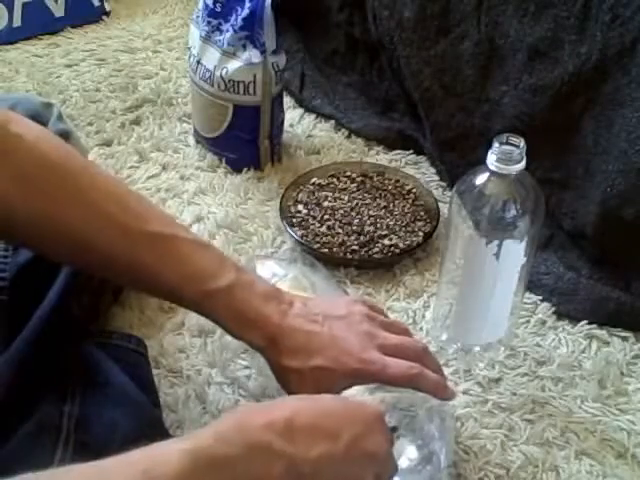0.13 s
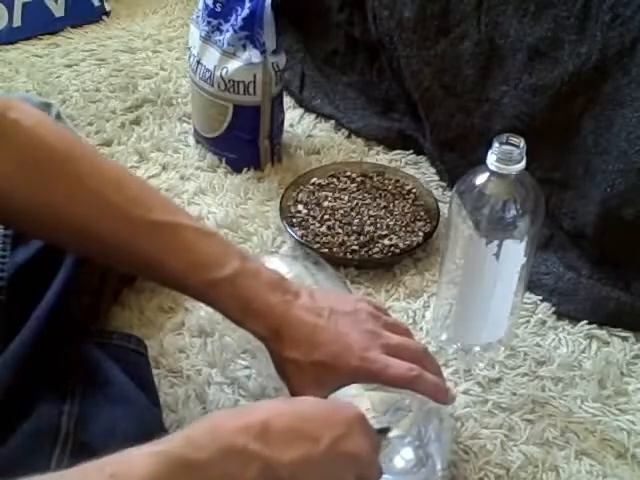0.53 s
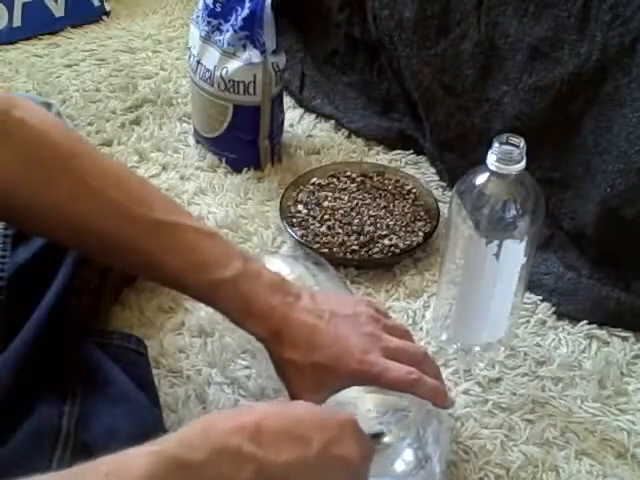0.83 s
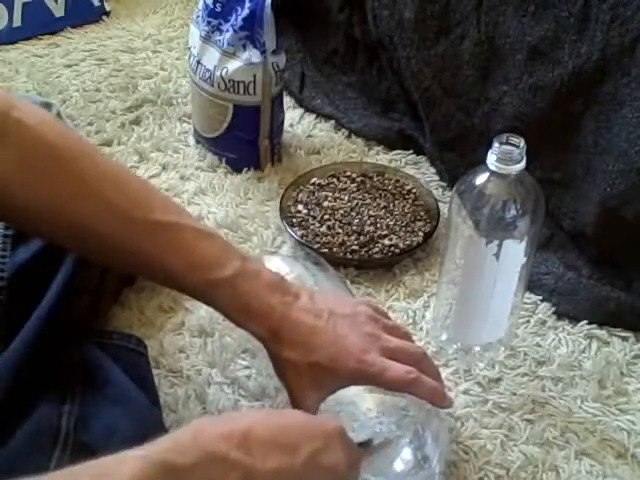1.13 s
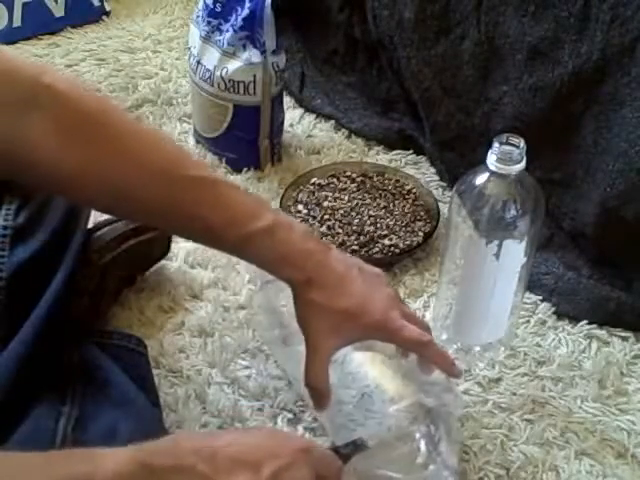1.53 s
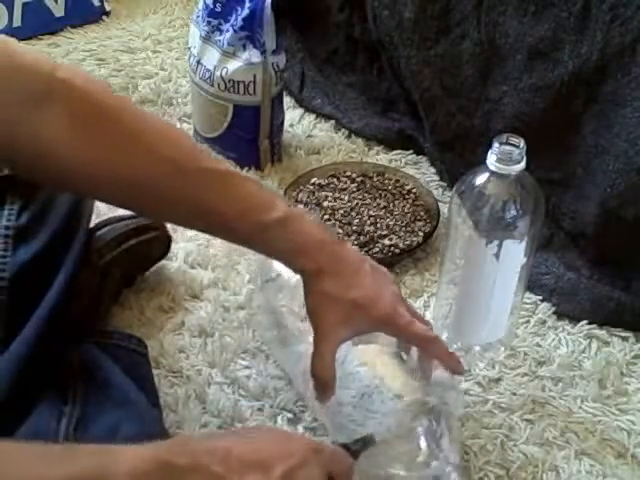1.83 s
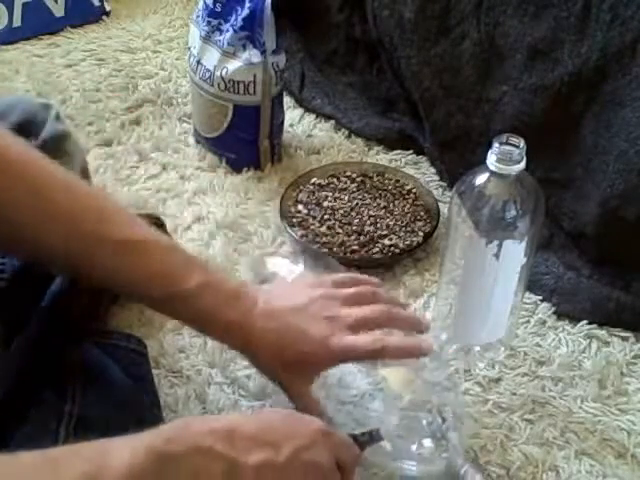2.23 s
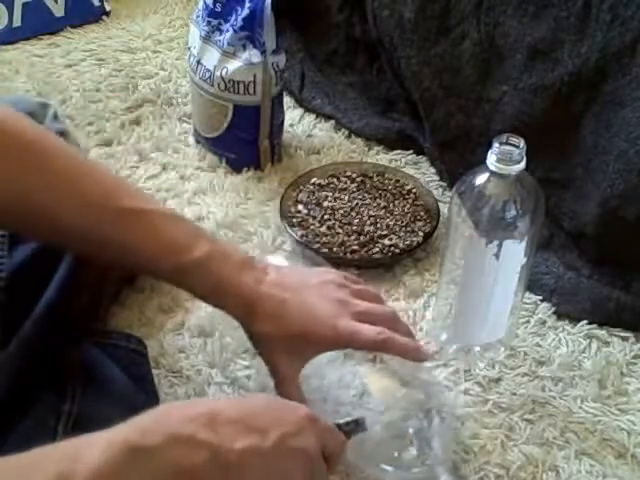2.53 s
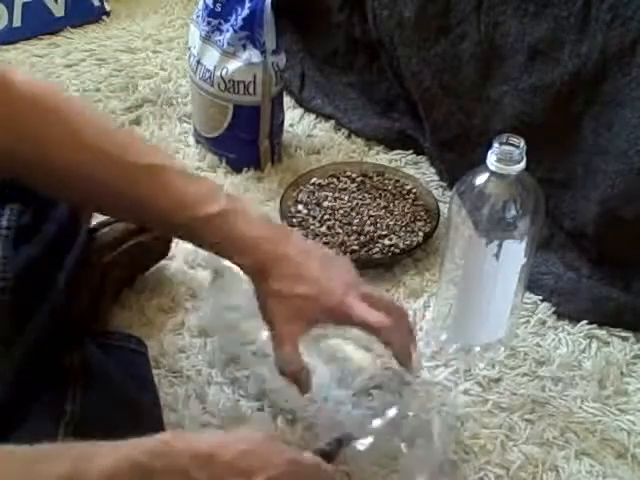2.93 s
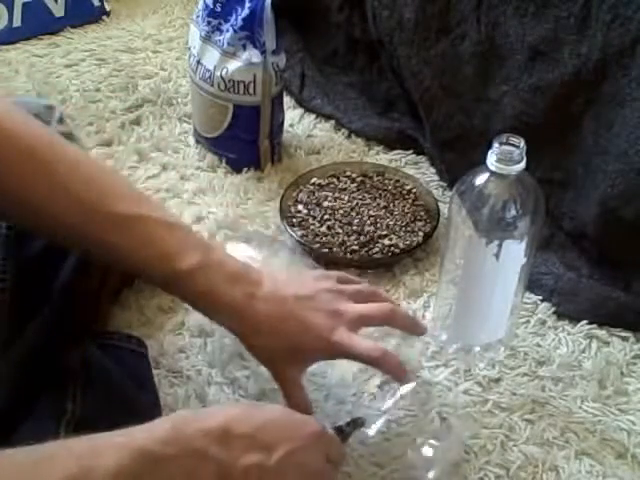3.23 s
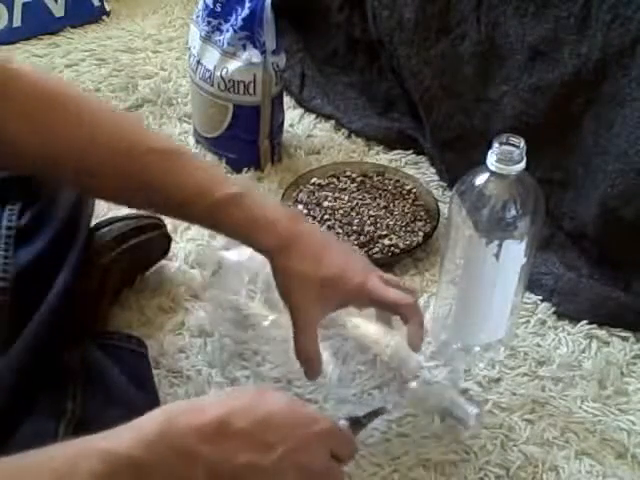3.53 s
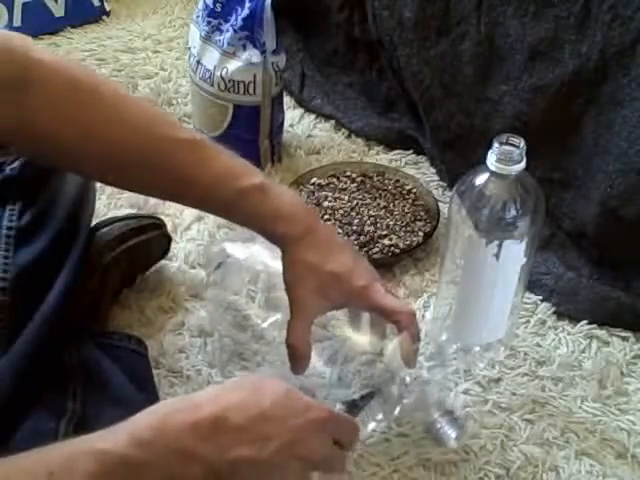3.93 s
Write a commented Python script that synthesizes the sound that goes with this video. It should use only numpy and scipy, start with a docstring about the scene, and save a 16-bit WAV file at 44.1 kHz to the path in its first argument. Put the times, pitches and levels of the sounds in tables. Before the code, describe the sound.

A thin plastic bottle snaps, crackles and pops hollowly in irregular bursts as it is cut with a small blade, close up indoors.

```python
"""A thin plastic bottle, held down on a carpet and worked with a small blade, close to the microphone. Its wall
snaps in bursts, each snap a bright crack, a knock of the panel and a thump of the shell, whose pitch is set by
the grip. Stiff patches pop hollowly. Hiss and shell rumble swell where the plastic is scraped and where the
wall crinkles on after a snap. A small room answers over a low hum, and the loudest cracks are flattened at a
ceiling."""
import sys
import numpy as np
from scipy import signal
from scipy.fft import rfft, irfft, next_fast_len
from scipy.io import wavfile
from scipy.ndimage import map_coordinates

SR = 44100
rng = np.random.default_rng(int(sys.argv[2]) if len(sys.argv) > 2 else 0)


def store_pcm(level_fs):
    """Save levels as 16-bit WAV."""
    pcm = np.round(np.clip(level_fs, -1, 1) * 32767).astype(np.int16)
    wavfile.write(sys.argv[1], SR, np.atleast_2d(pcm).T)


N = 180413

# The wall snapping, close up. Each row: start in seconds, then crack, after-ring and push in relative dB.
WALL_SNAPS = [(.0077, -36, -51, -36), (.0503, -15, -21.5, -36), (0.0996, -20, -34, -26),
              (0.192, -32.5, -41, -40), (.418, -42.5, -47.5, -49.5), (1.0307, -20, -19.5, -39),
              (1.0437, -23, -26, -30), (1.2674, -3, -6.5, -30), (1.27, -8, -14.5, -33.5),
              (1.2807, -13, -12.5, -48.5), (1.4497, -26, -33.5, -39.5), (1.4653, -30.5, -46, -42.5),
              (1.498, -36.5, -67, -36.5), (1.5368, -18, -31, -34.5), (1.5465, -15, -23.5, -33.5),
              (1.62, -28.5, -37, -47), (1.7356, -40, -56, -44), (1.7458, -33, -53, -35),
              (1.777, -33, -23.5, -15.5), (1.7789, -10.5, -45, -13), (1.8083, -19.5, -30.5, -26.5),
              (1.8688, -37, -66, -71), (2.0317, -27, -29, -26.5), (2.095, -31.5, -34, -36),
              (2.1659, -37.5, -46, -48), (2.29, -37, -44, -39), (2.3182, -23, -24, -45),
              (2.332, -16, -17.5, -42), (2.3374, -14.5, -26, -26), (2.4476, -34, -41, -42),
              (2.471, -34, -43, -32.5), (2.4861, -34, -36, -35.5), (2.6856, -39.5, -44, -47),
              (2.697, -20, -23.5, -28.5), (2.7167, -19, -32, -28), (2.8503, -34.5, -42.5, -57),
              (2.978, -40.5, -40, -54.5), (2.9996, -22.5, -27, -33.5), (3.0095, -17, -35, -14.5),
              (3.0143, -20.5, -31, -14.5), (3.0417, -22.5, -28, -52), (3.0977, -23.5, -25.5, -33),
              (3.194, -29.5, -38.5, -53), (3.452, -32.5, -38.5, -40), (3.6886, -18.5, -24.5, -19),
              (3.7102, -26, -34.5, -54)]
# Tone of the crack, the knock and the thump. Each row: frequency in Hz, relative level in dB.
SHEET_SPECTRUM = [(300, -20.5), (900, -8), (2000, -11), (2800, -10.5), (4200, -9), (5100, 3), (5800, 4.5),
                  (6700, -8), (7900, -16.5), (9300, -12), (10400, 1), (12100, -17.5), (14500, -16.5),
                  (16000, -26)]
PANEL_SPECTRUM = [(70, -25), (150, -1.5), (400, -6.5), (640, -3.5), (860, 0), (1020, -3.5), (1400, -9.5),
                  (1800, -10.5), (2500, -13.5), (5000, -19)]
SHELL_SPECTRUM = [(60, -40.5), (115, -24), (175, -6.5), (245, -2.5), (300, -3.5), (400, -11), (600, -18),
                  (1500, -27.5), (4000, -58)]
SHELL_HZ = 258  # pitch under an ordinary grip
PANEL_LIMIT_DB = -21  # above this push the knock levels off and the shell takes the rest
HOLLOW_DB, HOLLOW_GROWTH = -20.5, 0.69  # air ring after a 0 dB push; dB of ring per dB of push


def snaps(knock_dry=0.2, knock_wet=0.7, thump_dry=0.79, thump_wet=0.4):
    """Each snap cracks the sheet, knocks the panel, swings the shell and rings the air inside."""
    track, t = np.zeros(N), np.arange(SR // 3) / SR
    for start, crack_db, after_db, push_db in WALL_SNAPS:
        hz = grip_hz(start)
        tension = np.exp(0.015 * rng.standard_normal())  # shifts the wall's resonances a little
        sheet = struck(impulse(stretched(SHEET_SPECTRUM, tension), len(t)))
        panel = struck(impulse(stretched(PANEL_SPECTRUM, tension), len(t)))
        shell = struck(impulse(stretched(SHELL_SPECTRUM, hz / SHELL_HZ), len(t)))
        thump = amp(push_db)
        knock = thump / np.hypot(1, amp(push_db - PANEL_LIMIT_DB))
        hollow = amp(HOLLOW_DB + HOLLOW_GROWTH * push_db)
        add(track, start, amp(crack_db) * crease(sheet, rise_s=0.00047))
        add(track, start, knock_dry * knock * crease(panel, rise_s=0.00018))
        add(track, start, thump_dry * thump * shell_flex(t, hz))
        add(track, start, hollow * cavity(t, dull_db_per_octave=9))
        radiated = amp(after_db) * sheet + knock_wet * knock * panel + thump_wet * thump * shell
        add(track, start, room_echo(radiated, early_db=6, early_s=0.057, build_s=0.00067))
    return track


# Reflections inside the bottle and off the hand. Each row: typical delay in seconds, gain in dB.
NEAR_REFLECTIONS = [(.0016, -15), (.0029, -6.5), (.0047, -26), (.0075, -29.5)]


def crease(ring, rise_s, size=1024):
    """A crease gives way in a brief run of tiny slips, rung through the wall and reflected close by."""
    age = np.arange(size) / SR / (rise_s * rng.uniform(0.9, 1.5))
    slips = rng.choice([-1, 1], size) * age * np.exp(-age)
    direct = signal.fftconvolve(slips, ring[:size])
    sound = direct.copy()
    for delay_s, db in NEAR_REFLECTIONS:
        add(sound, delay_s * rng.uniform(0.65, 1.3), amp(db) * direct)
    return struck(sound)


# The shell's modes. Each row: pitch ratio, relative level in dB, seconds to fall 60 dB.
SHELL_MODES = [(.78, -18, 0.11), (1, 3.5, 0.13), (1.42, -12.5, .07)]


def shell_flex(t, hz):
    """The whole shell flexes in a few damped modes, each slightly detuned."""
    detunes = 1 + 0.015 * rng.standard_normal(len(SHELL_MODES))
    return struck(sum(amp(db - 60 * t / t60) * np.sin(2 * np.pi * hz * ratio * detune * t)
                      for (ratio, db, t60), detune in zip(SHELL_MODES, detunes)))


# The hand holding the bottle to the carpet. Each row: time in seconds, shell pitch in Hz.
GRIP_PITCH = [(.35, 290), (1.03, 292.3), (1.27, 363), (1.55, 345), (1.65, 239.2), (2.85, 244.7),
              (3.01, 231), (3.1, 331), (3.45, 323), (3.69, 306)]


def grip_hz(time_s):
    """The pitch to which the grip tunes the shell at this moment."""
    return np.interp(time_s, *np.transpose(GRIP_PITCH))


# The air in the bottle. Each row: frequency in Hz, relative level in dB, seconds to fall 60 dB.
AIR_MODES = [(802, -6.5, 0.18), (828.6, 7.5, 0.15), (1058, -14.5, 0.22), (1214, -8.5, 0.33),
             (1347, -3.5, 0.21), (1446, -3.5, 0.28)]


def cavity(t, dull_db_per_octave=0):
    """The enclosed air rings, each blow shared anew among its modes; dulling favours the lowest."""
    ring = np.zeros(len(t))
    for hz, db, t60 in AIR_MODES:
        mode_db = db - dull_db_per_octave * np.log2(hz) + 2 * rng.standard_normal()
        ring += amp(mode_db - 60 * t / t60) * np.sin(2 * np.pi * (hz * t + rng.random()))
    return struck(ring * (1 - np.exp(-t / 0.003)))


# Stiff patches popping through. Each row: start in seconds, relative level in dB, pitch ratio.
PATCH_POPS = [(0.0512, -8.5, 1), (.098, -11, 0.94), (1.030, -20, 0.65), (1.2674, -21, 0.69),
              (3.0097, -19, 0.4), (3.6885, -25, 1)]
# Tone of a pop. Each row: frequency in Hz, relative level in dB.
POP_SPECTRUM = [(60, -19), (110, -4), (240, -7.5), (450, -10.5), (660, -7.5), (810, -5), (980, -7),
                (1330, -7), (1650, -19.5), (2400, -40), (3200, -21), (4300, -26.5), (8000, -36)]


def pops(dry=0.75, wet=0.56, hollow=0.46):
    """A stiff curved patch flips in one jolt and rings hollow."""
    track, t = np.zeros(N), np.arange(SR // 2) / SR
    for start, db, ratio in PATCH_POPS:
        ring = struck(impulse(stretched(POP_SPECTRUM, ratio), len(t)))
        room = struck(room_echo(ring, early_db=1.5, early_s=0.017, build_s=0.0046))
        add(track, start, amp(db) * (dry * ring + wet * room + hollow * cavity(t)))
    return track


# Swells of hiss and shell rumble: scrapes on the plastic, and the wall crinkling on after snaps.
# Each row: middle and half length in seconds, then hiss and shell rumble in relative dB.
SWELLS = [(0.145, 0.027, -28.5, -50), (0.351, 0.011, -48, -39.5), (1.22, 0.031, -39, -52),
          (1.402, 0.014, -31, -65), (1.651, 0.011, -33.5, -41), (1.775, 0.01, -18, -39),
          (2.778, 0.033, -45, -37), (3.024, 0.013, -17.5, -18), (3.107, 0.012, -27, -30.5),
          (3.419, 0.034, -34, -39), (3.681, 0.0091, -43.5, -34.5)]


def scrapes_and_crinkles(slips_per_s=1000, rest_db=-59, dry=0.43, wet=0.42, drone=0.64,
                         scuff=0.9, scuff_hz=380, uneven_db=4):
    """Stick-slip grains hiss in the sheet and make the shell drone; the holding hand rustles faintly."""
    t = np.arange(N) / SR
    grains = (rng.random(N) < slips_per_s / SR) * rng.standard_normal(N)
    hiss_level = amp(rest_db + 1.5 * wobble(17)) + creep()
    rumble = np.zeros(N)
    # the grains also stir a broader, higher ring of the shell
    scuff_ring = struck(impulse(stretched(SHELL_SPECTRUM, scuff_hz / SHELL_HZ), SR // 8))
    for middle, half_s, hiss_db, rumble_db in SWELLS:
        swell = np.exp(-((t - middle) / half_s) ** 2 / 2)
        shell = shell_flex(t[:SR // 8], grip_hz(middle)) + scuff * scuff_ring
        hiss_level += amp(hiss_db) * swell
        rumble += amp(rumble_db) * swell * unit(signal.oaconvolve(grains, shell)[:N])
    hiss = hiss_level * coloured(grains * amp(uneven_db * rng.standard_normal(N)), SHEET_SPECTRUM)
    room = room_echo(hiss, early_db=11, early_s=0.016, build_s=0.0019)
    return dry * hiss + drone * rumble + wet * room


def creep(load_s=0.018, settle_s=0.06, base_db=-34, growth=0.71):
    """Strength of the wall's fine crinkling as strain builds before each snap and settles after it."""
    t = np.arange(-SR // 8, SR // 4) / SR
    swell = np.exp(np.minimum(t / load_s, -t / settle_s))
    power = np.zeros(N)
    for start, crack_db, *_ in WALL_SNAPS:
        add(power, start + t[0], (amp(base_db + growth * crack_db) * swell[t >= -start]) ** 2)
    return np.sqrt(power)


def level_dip(start_s=3.064, depth_db=-14.5, fall_s=0.01, recover_s=0.14):
    """The level falls quickly and climbs back slowly, cutting the longest rattle short."""
    t = np.arange(N) / SR - start_s
    return amp(np.interp(t, [0, fall_s, fall_s + recover_s], [0, depth_db, 0]))


# The small carpeted room around the bottle. Each row: frequency in Hz, seconds to fall 60 dB.
ROOM_DECAY = [(120, 0.33), (300, 0.2), (900, 0.28), (2500, 0.33), (5500, 0.24), (10000, 0.22),
              (15000, 0.29)]


def room_echo(x, early_db, early_s, build_s, lumpiness=0.13):
    """Bottle and room answer with an uneven rattle of early reflections, then a tail that dies by band."""
    hz, frame_s, bands = signal.stft(rng.standard_normal(SR // 2), SR, nperseg=256)
    decay = amp(-60 * frame_s / along(ROOM_DECAY, hz)[:, None])
    tail = signal.istft(bands * decay, SR, nperseg=256)[1]
    t = np.arange(len(tail)) / SR
    lumps = np.exp(lumpiness * map_coordinates(rng.standard_normal(400), [t * 700], order=1))
    early_lift = 1 + amp(early_db) * np.exp(-(t / early_s) ** 2)
    tail *= lumps * (1 - np.exp(-t / build_s)) * early_lift
    return signal.fftconvolve(x, tail / np.linalg.norm(tail))[:len(x)]


# The room behind the bottle: noise, hum and whine. Each row: frequency in Hz, relative level in dB.
NOISE_SPECTRUM = [(20, -13.5), (30, -44.5), (45, -6), (100, -25), (150, -32), (350, -31.5), (600, -38),
                  (1250, -34.5), (2000, -45.5), (4000, -53), (8000, -55.5), (16000, -58)]
HUM_TONES = [(16.5, -36), (19, -54), (59, -54.5), (97, -55), (118, -56), (357, -82.5), (393, -67.5)]
WHINE_TONES = [(7800, -79), (8300, -87)]


def room_tone(noise_db=-46):
    """Low room noise, a slightly unsteady hum and a thin electrical whine."""
    t = np.arange(N) / SR
    tones = sum(amp(db) * np.sqrt(2) * np.sin(2 * np.pi * hz * t + 0.5 * wobble(3.5))
                for hz, db in HUM_TONES + WHINE_TONES)
    return amp(noise_db) * coloured(rng.standard_normal(N), NOISE_SPECTRUM) + tones


def amp(db):
    """Decibels to gain."""
    return 10 ** (np.asarray(db) / 20)


def unit(x):
    """x at rms 1."""
    return x / np.sqrt(np.mean(x ** 2) + 1e-20)


def struck(x):
    """x with the energy of 10 ms at rms 1."""
    return x / np.linalg.norm(x) * np.sqrt(SR / 100)


def along(points, hz):
    """(Hz, value) points read on a log axis."""
    knots_hz, values = np.transpose(points)
    return np.interp(np.log(hz + 1), np.log(knots_hz + 1), values)


def stretched(spectrum, ratio):
    """The same spectrum at a higher or lower pitch."""
    return [(hz * ratio, db) for hz, db in spectrum]


def filtered(x, response):
    """x times a response of frequency."""
    size = next_fast_len(len(x) + 8192)
    return irfft(rfft(x, size) * response(np.fft.rfftfreq(size, 1 / SR)), size)[:len(x)]


def coloured(x, spectrum):
    """x shaped by a spectrum, at rms 1."""
    return unit(filtered(x, lambda hz: amp(along(spectrum, hz))))


def impulse(spectrum, length, size=2048):
    """The minimum-phase ring of a body with this spectrum, padded to length samples."""
    gains = amp(along(spectrum, np.fft.rfftfreq(size, 1 / SR)))
    cepstrum = irfft(np.log(gains))
    cepstrum[1:size // 2] *= 2
    cepstrum[size // 2 + 1:] = 0
    return np.pad(irfft(np.exp(rfft(cepstrum))), (0, length - size))


def wobble(rate):
    """A smooth random curve, rate knots a second."""
    return map_coordinates(rng.standard_normal(int(N * rate / SR) + 4), [np.arange(N) * rate / SR])


def add(track, start_s, sound):
    """Mix a sound into the track."""
    part = track[max(round(start_s * SR), 0):][:len(sound)]
    part += sound[:len(part)]


def scene(lowest_hz=125):
    """The bottle up close, too small to radiate deep bass, with the room behind it; one channel."""
    bass_cut = signal.butter(2, lowest_hz, "high", fs=SR, output="sos")
    bottle = signal.sosfilt(bass_cut, pops() + snaps() + scrapes_and_crinkles())
    return (level_dip() * bottle + room_tone())[None]


def record(dry):
    """The loudest cracks are flattened at a ceiling; nothing above the band limit is kept."""
    ceiling, top_hz = 0.92, 15900
    clipped = np.clip(dry[0], -ceiling, ceiling)
    return filtered(clipped, lambda hz: 1 / (1 + (hz / top_hz) ** 120))[None]


dry = scene()
out = record(dry)
store_pcm(out)
```